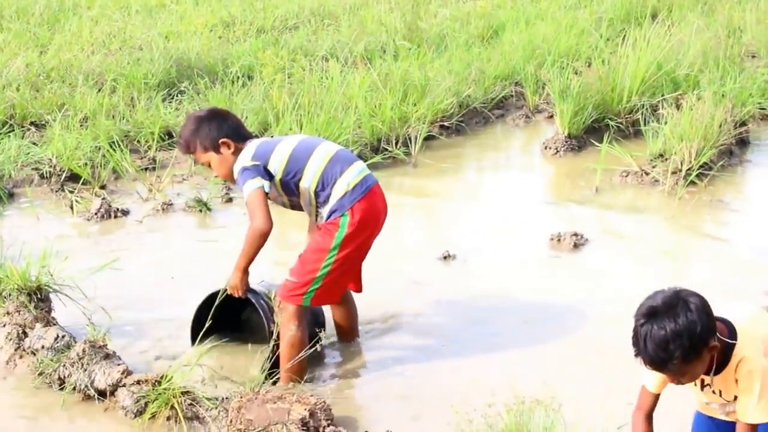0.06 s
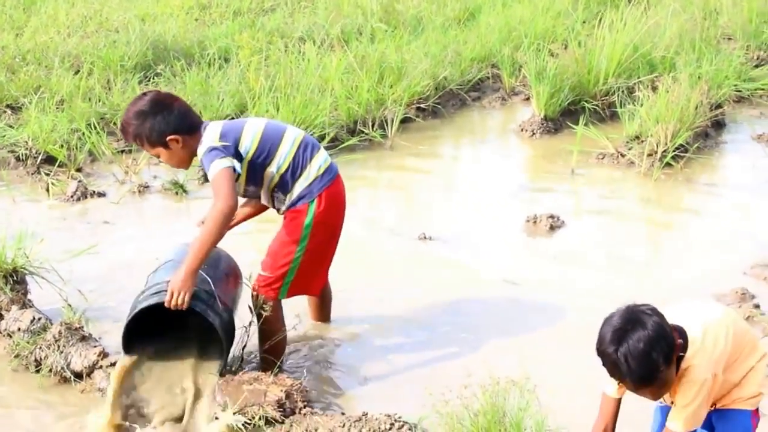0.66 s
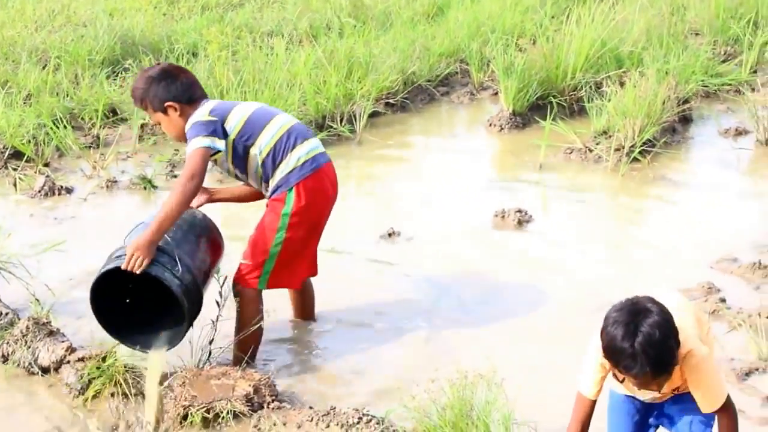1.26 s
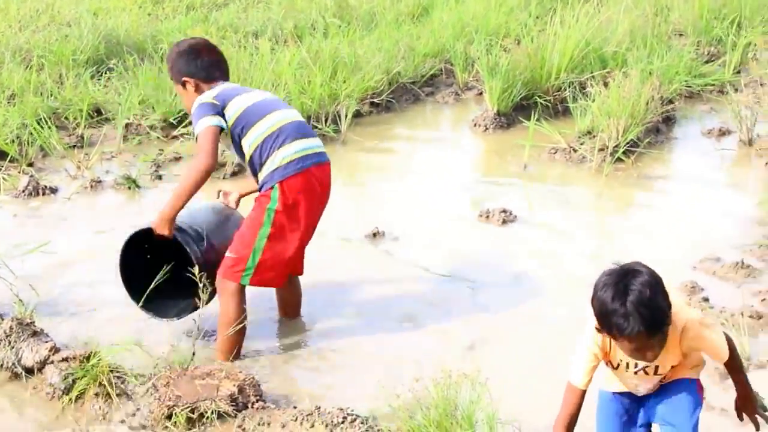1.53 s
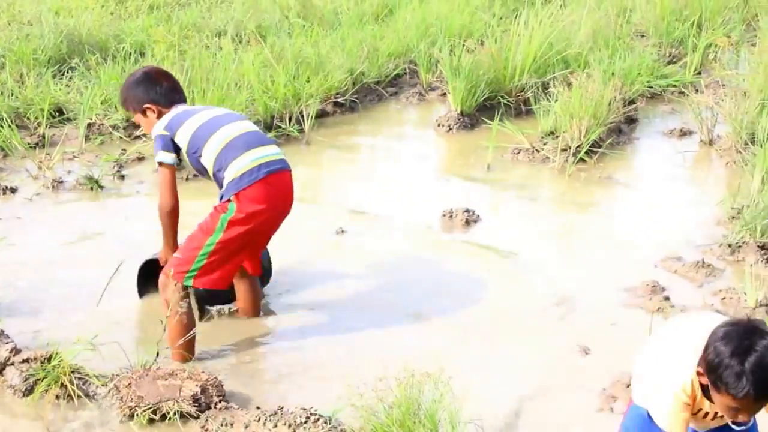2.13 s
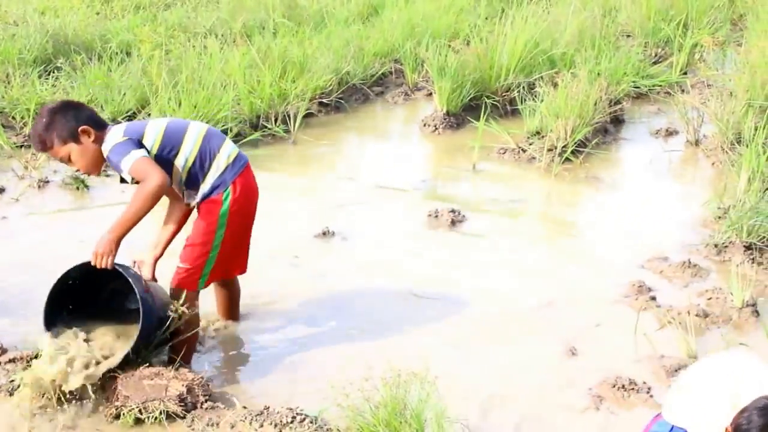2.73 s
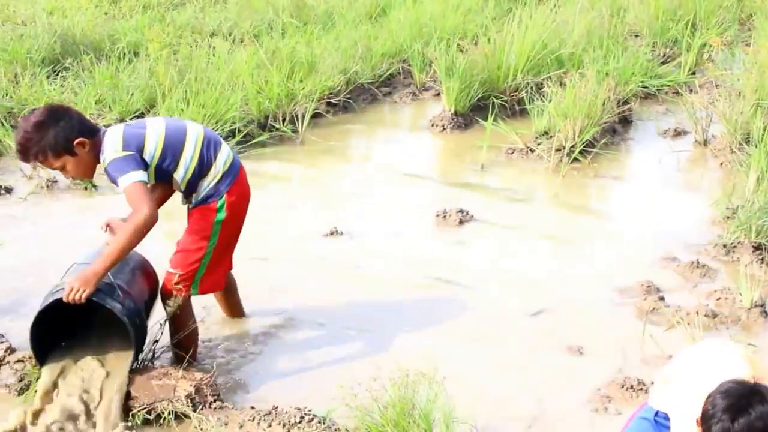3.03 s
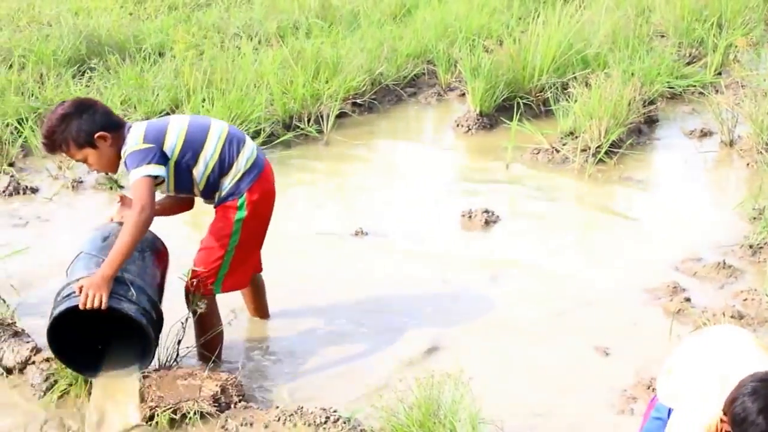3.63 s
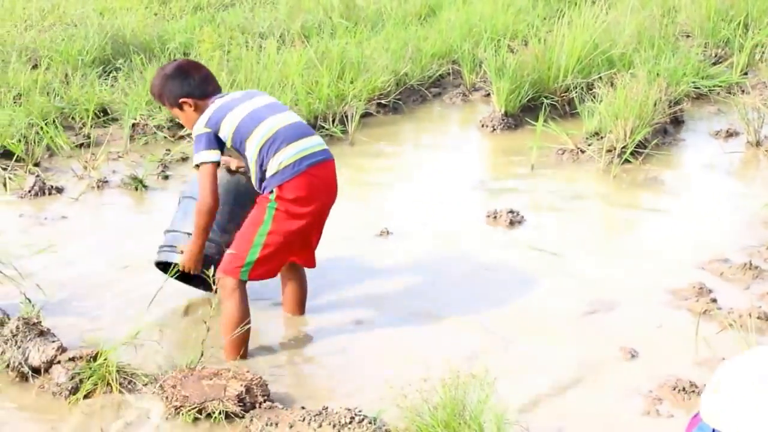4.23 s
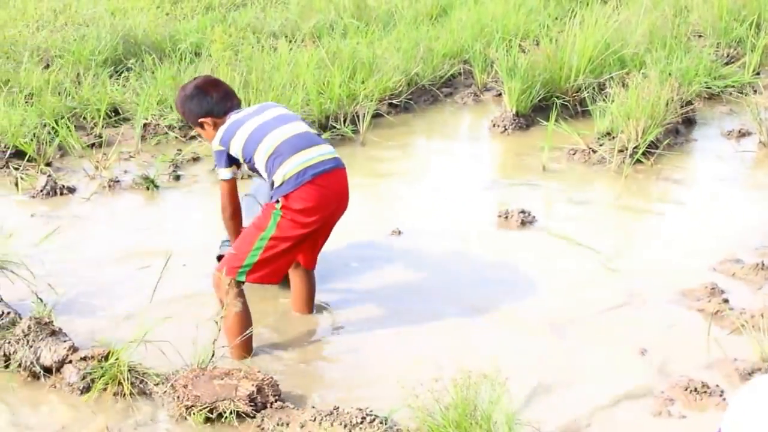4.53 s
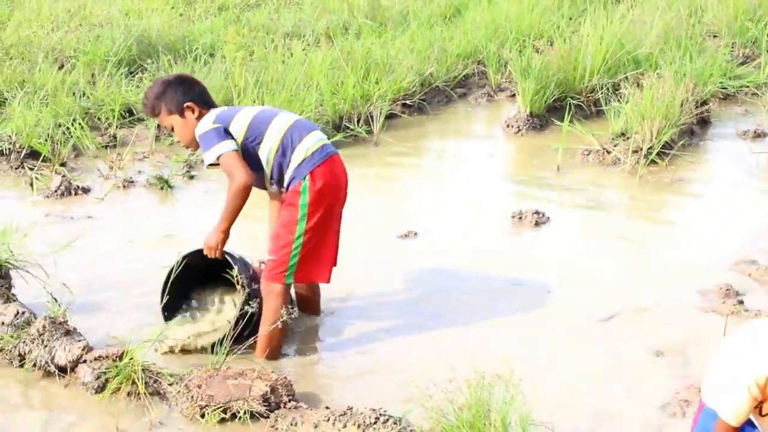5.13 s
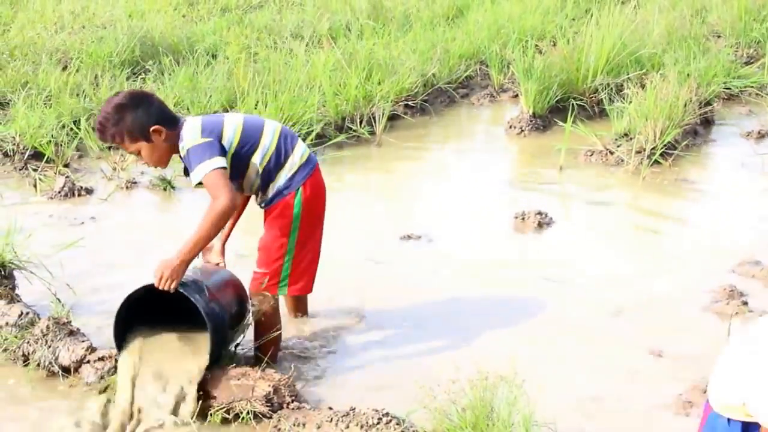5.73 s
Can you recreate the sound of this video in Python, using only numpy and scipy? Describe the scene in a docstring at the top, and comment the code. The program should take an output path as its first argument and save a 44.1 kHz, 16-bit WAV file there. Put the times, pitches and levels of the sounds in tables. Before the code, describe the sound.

A plastic bucket sloshes through a shallow muddy pool a few metres away, then is tipped onto the bank with a wet slap and a stream that drains off. A second scoop and pour follow, with plops and spatters between. A hard thump of wind hits the microphone before a third scoop and a softer pour at the very end. Gusts rumble throughout over a faint outdoor hiss.

```python
"""Wind rumbles on the microphone over a soft hiss as a plastic bucket sloshes through a shallow muddy pool.
The water is a cloud of short bubbles, drop impacts and foam; single plops and spatters stand out of it.
At 0.7 s the bucket is tipped out on the bank: a slap, then a stream that drains away. A second scoop
is poured out at 3 s. At 4.4 s the hardest thump of wind makes the limiter briefly turn everything down.
A third scoop follows, and its softer pour begins at 5.6 s, just before the end."""
import sys
import numpy as np
from scipy import signal
from scipy.fft import rfft, irfft
from scipy.io import wavfile
from scipy.ndimage import uniform_filter1d

SR = 44100
rng = np.random.default_rng(int(sys.argv[2]) if len(sys.argv) > 2 else 0)


def master(y):
    """Save y as 16-bit WAV."""
    cut = np.clip(np.atleast_2d(y).T, -1, 1)
    pcm = np.round(cut * 32767)  # scale
    wavfile.write(sys.argv[1], SR, pcm.astype(np.int16))


N = 254898
TIME = np.arange(N) / SR
FREQS = np.fft.rfftfreq(N, 1 / SR)

# Levels in a table compare its rows; the functions set the final loudness.
# tone of the still air over the field: (frequency [Hz], level [dB])
AIR_TONE = [(90, -15), (170, 1), (330, -6), (600, -6.5), (800, -4.5), (1200, -19), (1420, -17.5),
            (2400, -21.5), (7500, -17), (12000, -24.5), (15700, -28)]
# tones of the slow and the quick swirls of wind: (frequency [Hz], level [dB])
RUMBLE_TONE = [(8, -20), (24, 1.5), (45, -4.5), (80, -4.5), (110, -20.5), (200, -33), (500, -100)]
FLUTTER_TONE = [(50, -63), (95, 6.5), (160, -3), (250, -17), (400, -30), (900, -98), (3000, -100)]
# the breeze under the gusts, with a lull in the middle: (time [s], level [dB])
BREEZE_LEVELS = [(0, -34), (.6, -38), (1.3, -26.5), (1.65, -37.5), (2.2, -33), (2.65, -47), (2.9, -43),
                 (3.05, -27.5), (4.1, -30.5), (4.3, -39.5), (4.7, -27), (5.8, -37)]
# gusts at the microphone: (time [s], length [s], rumble [dB], flutter [dB])
WIND_GUSTS = [(0.013, 0.032, -20.5, -36), (.17, 0.015, -24, -34.5), (0.338, 0.18, -20.5, -26),
              (0.649, 0.035, -13, -18.5), (0.723, 0.15, -18, -28), (0.876, 0.34, -24, -28),
              (1.28, 0.14, -29, -36), (1.742, 0.089, -27, -39.5), (1.951, 0.083, -20, -32),
              (3.055, 0.03, -24, -36), (3.166, 0.11, -31, -46), (3.516, 0.032, -19.5, -29),
              (3.71, 0.059, -24.5, -30), (4, 0.16, -26.5, -38.5), (4.426, 0.027, -10.5, -25),
              (4.564, 0.075, -19, -26.5), (4.922, .16, -23.5, -33), (5.204, 0.014, -21, -29),
              (5.347, 0.072, -28.5, -32), (5.517, 0.041, -23.5, -37), (5.655, 0.2, -24, -28.5)]
# single swirls that thump the microphone: (time [s], level [dB], swing rate [Hz])
WIND_THUMPS = [(0.345, -6, 77), (0.347, -12.5, 200), (0.408, -12, 164), (0.417, -14.5, 280),
               (0.451, -12.5, 205), (0.584, -3, 44.6), (0.663, -10, 85), (0.663, -9, 200),
               (0.691, -2, 28.3), (1.233, -8.5, 134), (1.974, -12, 45), (3.526, -17, 40), (4.402, -7.5, 29),
               (4.43, 8.5, 66), (4.605, -5, 32.3), (4.64, -6.5, 52), (5.744, -5.5, 51)]

# tone of moving water: (frequency [Hz], level [dB])
WATER_TONE = [(120, -11), (190, 2.5), (255, 2), (365, -3.5), (460, -2), (600, 1.5), (900, -5.5), (1400, -7),
              (2500, -11.5), (4000, -17), (6000, -19.5), (9500, -25), (13000, -30.5), (15700, -36)]
# the pool keeps lapping between scoops: (time [s], level [dB])
LAPPING_LEVELS = [(0, -46), (1.5, -44), (2.1, -45.5), (3.8, -44), (4.2, -49.5), (4.5, -55), (4.7, -47.5),
                  (5.0, -43.5), (5.8, -37)]
# bucket and legs push through the pool:
# (time [s], length [s], level [dB], boost per step up in band [dB], extra gulping [dB])
SCOOP_SLOSHES = [(0.0, 0.054, -43, -6, 4), (0.24, 0.038, -50, 1, 8), (0.338, 0.14, -38.5, 1, 5.5),
                 (0.554, 0.042, -39, -1.5, 3), (0.984, 0.062, -28.5, -4, -8), (1.138, 0.038, -32, 0, 5),
                 (2.175, 0.23, -33.5, -4, -13), (2.476, 0.2, -34, 1.5, -0.5), (2.71, 0.079, -40, 0.5, 1),
                 (2.87, 0.0065, -32.5, 1, -15), (3.07, 0.042, -31, -3.5, 5), (3.37, 0.027, -36, -3, 1),
                 (3.588, 0.15, -36, -3.5, -14), (3.731, 0.05, -31.5, -1, -6),
                 (4.777, 0.16, -34.5, -5.5, -5.5), (5.07, 0.017, -50, 7, 20),
                 (5.221, 0.046, -32.5, .5, 0.5), (5.335, 0.074, -37, 0.1, 2), (5.446, 0.073, -38, -2.3, 9)]
# notes at which the air in the bucket rings: (frequency [Hz], width [Hz], level [dB])
BUCKET_NOTES = [(563, 99, -40), (942, 160, -8.5), (1408, 38, -10.5)]
# single air pockets that ring out clearly: (time [s], pitch [Hz], level [dB])
LOUD_PLOPS = [(0.1503, 2010, -28), (0.2656, 990, -29), (.2668, 2840, -22.5), (.3391, 1490, -18.5),
              (0.582, 1730, -28), (.7256, 1766, -19), (.7251, 662, -11.5), (.8896, 694, -20),
              (.9882, 325, -19), (1.0433, 1950, -18), (1.056, 2541, -19), (1.1438, 990, -17.5),
              (1.1468, 2120, -21), (1.4737, 2230, -23), (1.4924, 1500, -22), (1.517, 950, -27.5),
              (1.5679, 1470, -18), (1.5793, 1490, -20), (1.8854, 1930, -29), (1.9256, 3550, -24),
              (1.9615, 1000, -24), (1.976, 1440, -26), (2.0949, 2020, -25), (2.1129, 596, -26.5),
              (2.1453, 1820, -25.5), (2.161, 2660, -25), (2.1973, 554, -21.5), (2.2651, 810, -23.5),
              (2.3465, 3430, -16.5), (2.3267, 634, -28), (2.404, 1100, -22.5), (2.4301, 2030, -26),
              (2.4806, 500, -22), (2.616, 813, -12.5), (2.6509, 2390, -13), (2.6549, 1860, -14.5),
              (2.6968, 277, -24.5), (2.8706, 220, -24), (2.975, 830, -15.5), (2.9876, 590, -16),
              (3.0265, 293, -16), (3.0791, 556, -16.5), (3.085, 273, -18), (3.2462, 574, -17),
              (3.3048, 590, -19), (3.3674, 444, -21), (3.3916, 910, -22), (3.5912, 453, -19.5),
              (4.8062, 1140, -23.5), (4.8488, 1310, -24), (5.2231, 2153, -28), (5.4814, 497, -21.5),
              (5.6192, 598, -18.5), (5.6292, 1470, -21)]
# flung water lands on pool and mud: (time [s], level [dB], middle frequency [Hz], fade time [s])
FLUNG_WATER = [(0.233, -31, 1390, 0.011), (.268, -31, 3020, .0072), (0.337, -36, 3000, .004),
               (.403, -28.5, 4530, 0.0037), (.679, -33, 1500, 0.0098), (.715, -26, 1480, 0.012),
               (0.995, -42, 5500, .004), (1.282, -30.5, 8100, 0.0036), (1.566, -27.5, 1480, 0.014),
               (1.65, -26, 9800, .0016), (1.92, -33, 4180, .005), (2.159, -34, 3500, .005),
               (2.182, -27, 1310, 0.011), (2.238, -31, 3930, 0.0051), (2.299, -26.5, 3100, 0.0033),
               (2.328, -24.5, 750, 0.0037), (2.336, -25, 2800, .008), (2.403, -36, 1700, 0.0032),
               (2.465, -29, 3400, 0.012), (2.569, -25, 2930, 0.0089), (2.443, -31, 4400, .005),
               (2.649, -24, 2400, 0.0088), (2.721, -34, 3680, 0.006), (2.945, -24, 3840, 0.013),
               (2.974, -16.5, 1520, 0.016), (3.142, -27.5, 6000, .0039), (3.205, -25.5, 3000, 0.008),
               (3.735, -27.5, 3540, .0053), (4.291, -29, 1380, 0.0031), (4.609, -31, 3320, 0.0018),
               (4.926, -23.5, 4100, 0.0027), (5.22, -24.5, 2450, 0.0072), (5.387, -24, 3930, 0.0049),
               (5.486, -29, 3520, .005), (5.62, -20, 1700, 0.0061), (5.696, -30, 3400, 0.0034)]
# the bucket is tipped out:
# (landing time [s], length at full flow [s], stream [dB], first slap [dB], extra gulping [dB])
BUCKET_POURS = [(0.687, 0.5, -31, -24.5, -10), (2.973, 0.31, -29.5, -28.5, -5.5),
                (5.625, .2, -36.5, -57, -5)]

# The water has four bands, from low to high: (gulping, gurgling, splashing, spray)
LAP_DB, SLOSH_DB = (-6.5, -5.5, -1, -6), (-7, -1.5, -3, -8)
SLAP_DB, STREAM_DB = (-4.5, -1, -2.5, -8.5), (-1, -2, -3, -9)
DRAIN_S = (0.16, 0.22, 0.24, 0.15)  # the spray dies first as the stream thins


def gain_of(db):
    """Turns decibels into a number to multiply a sound by."""
    return 10 ** (np.asarray(db) / 20)


def evened(x):
    """Scales a signal so that its average strength (rms) is 1."""
    return x / np.sqrt(np.mean(x ** 2) + 1e-20)


def colour(points):
    """Joins the points of a tone table into a gain for every frequency."""
    hz, db = np.transpose(points)
    return gain_of(np.interp(np.log(FREQS + 1), np.log(hz + 1), db))


def filtered(x, gain):
    """Turns each frequency up or down by its own gain."""
    return irfft(rfft(x) * gain, N)


def level_curve(table):
    """Joins the points of a level table into a gain for every moment."""
    times, db = np.transpose(table)
    return gain_of(np.interp(TIME, times, db))


def add(mix, start, sound):
    """Mixes a sound in at a start time in seconds."""
    part = mix[max(round(start * SR), 0):][:len(sound)]
    part += sound[:len(part)]


def wander(rate_hz):
    """A smooth random drift up and down."""
    return evened(filtered(rng.standard_normal(N), np.exp(-(FREQS / rate_hz) ** 2)))


def surge(start, length, rise_s, fall_s):
    """A loudness shape that is full by the start time, holds, then dies away."""
    rising = np.clip((TIME - start) / rise_s + 1, 0, 1)
    return rising * np.exp(-np.clip((TIME - start - length) / fall_s, 0, 40))


def air(level_db, waver_db):
    """The open field hisses softly, and the level flickers a little."""
    hiss = evened(filtered(rng.standard_normal(N), colour(AIR_TONE)))
    return gain_of(level_db + waver_db * wander(rate_hz=23)) * hiss


def swirls(tone, steadiness):
    """Swirling air pushes at random; a steadiness near 1 evens out its strength."""
    swirl = signal.hilbert(filtered(rng.standard_normal(N), colour(tone)))
    strength = np.sqrt(uniform_filter1d(abs(swirl) ** 2, size=1800) + 1e-20)
    return evened(swirl.real / strength ** steadiness)


def wind(rumble_db, flutter_db, thump_db, swings_in, swings_out):
    """Gusts rumble and flutter over a breeze; big swirls hit the microphone fast and swing out."""
    power = np.outer(gain_of([0, -10.5]), level_curve(BREEZE_LEVELS)) ** 2  # rumble, weaker flutter
    for start, length, *db in WIND_GUSTS:
        power += np.outer(gain_of(db), surge(start, length, rise_s=0.034, fall_s=0.03)) ** 2
    rumble, flutter = np.sqrt(power)
    out = gain_of(rumble_db) * rumble * swirls(RUMBLE_TONE, steadiness=0.63)
    out += gain_of(flutter_db) * flutter * swirls(FLUTTER_TONE, steadiness=0.74)
    t = np.arange(-SR // 10, SR // 10) / SR
    swings = np.where(t < 0, swings_in, swings_out)
    for when, db, hz in WIND_THUMPS:
        thump = -np.sin(2 * np.pi * hz * t) / np.cosh(hz * t / swings)
        add(out, when + t[0], gain_of(db + thump_db) * thump)
    return out


def water_flow():
    """Lapping, sloshes and pours add up to the strength of each of the four bands over time."""
    power = np.outer(gain_of(LAP_DB), level_curve(LAPPING_LEVELS)) ** 2
    band_step, gulping = np.array([-1, 0, 1, 2]), np.array([1, 0, 0, 0])
    for start, length, db, bright_db, gulp_db in SCOOP_SLOSHES:
        slosh = gain_of(db + np.array(SLOSH_DB) + bright_db * band_step + gulp_db * gulping)
        power += np.outer(slosh, surge(start, length, rise_s=0.029, fall_s=0.052)) ** 2
    for start, length, stream_db, slap_db, gulp_db in BUCKET_POURS:
        slap = gain_of(slap_db + np.array(SLAP_DB) - 1.5 * gulping)
        power += np.outer(slap, surge(start, length=0.057, rise_s=0.025, fall_s=0.018)) ** 2
        stream = gain_of(stream_db + np.array(STREAM_DB) + gulp_db * gulping)
        for band, drain in enumerate(DRAIN_S):
            power[band] += (stream[band] * surge(start, length, rise_s=0.025, fall_s=drain)) ** 2
    return np.sqrt(power)


def bubble(hz, swell_s, rise, roundness):
    """An air pocket swells, rings briefly in the thick water, and rises in pitch as it surfaces."""
    age = np.arange(int(9 * swell_s * SR) + 2) / (swell_s * SR)  # loudest at age 1
    pitch = hz * (1 + rise * np.tanh((age - 1) / 2))
    loudness = (age * np.exp(1 - age)) ** roundness
    return loudness * np.sin(2 * np.pi * np.cumsum(pitch) / SR)


def impacts(per_s, spread_db):
    """Clicks at random times, many small and a few large."""
    out = np.zeros(N)
    when, chance = rng.random((int(per_s * N / SR) + 1, 2)).T
    size = np.minimum(-np.log(1 - chance), 3.5)
    out[(when * N).astype(int)] = gain_of(spread_db * size) * (-1) ** np.arange(len(when))
    return out


def bubble_cloud(density, cycles, spread_db, rise):
    """Bubbles of all sizes; the small, high ones are more common and ring for more cycles."""
    out = np.zeros(N)
    for hz in np.geomspace(200, 12000, 60):
        khz = hz / 1000
        swell_s = cycles * khz ** 0.5 * rng.uniform(0.36, 1.73) / hz
        ring = bubble(hz, swell_s, rise, roundness=0.26)
        births = impacts(density * khz ** 0.7, spread_db)
        out += np.sqrt(khz) * evened(signal.oaconvolve(births, ring)[:N])
    return evened(out)


def churn(flow, bands_db, drops_db, foam_db, clump_db, gush_db):
    """Bubbles, drop impacts and foam come in clumps and follow the scooping and pouring."""
    grains = bubble_cloud(density=17, cycles=1.195, spread_db=2.5, rise=0.11)
    grains += gain_of(drops_db) * evened(impacts(per_s=1700, spread_db=3.0))
    # in a strong pour the tiny sounds merge into one gush
    foam = gain_of(foam_db) + flow[2] / gain_of(gush_db)
    grains = (evened(grains) + foam * rng.standard_normal(N)) / np.sqrt(1 + foam ** 2)
    grains *= gain_of(clump_db * wander(rate_hz=41))
    # large pockets gulp, middling ones gurgle, small ones splash, the finest make spray
    below = [1 / (1 + (FREQS / edge_hz) ** 8) for edge_hz in (450, 1100, 3500)]
    shares = np.maximum(np.diff(below, axis=0, prepend=0, append=1), 0)
    tone = colour(WATER_TONE)
    bands = [evened(filtered(grains, tone * np.sqrt(share))) for share in shares]
    return sum(gain_of(db) * level * band for db, level, band in zip(bands_db, flow, bands))


def bucket_ring(water):
    """The air in the open bucket rings along with the water in and around it."""
    ringing = sum(gain_of(db) / (1 + 2j * (FREQS - hz) / width) for hz, width, db in BUCKET_NOTES)
    return filtered(water, 1 + ringing)


def bank_echo(water, echo_db, fade_s):
    """The pool, the bucket and the banks scatter a very short echo."""
    t = np.arange(SR // 6) / SR
    bounces = rng.standard_normal(len(t)) * (rng.random(len(t)) < 0.06)
    bounces *= np.exp(-t / fade_s) * (t > 0.003)
    return water + gain_of(echo_db) * signal.oaconvolve(water, bounces / np.linalg.norm(bounces))[:N]


def droplets(spray, level_db, per_s, spread_db, tick_hz, tick_s):
    """Stray drops tick on the surface; the more spray, the louder."""
    hits = impacts(per_s, spread_db)
    t = np.arange(512) / SR
    tick_power = (t / tick_s) ** 2 * np.exp(-2 * t / tick_s)
    bursts = np.sqrt(abs(signal.oaconvolve(hits ** 2, tick_power)[:N]))
    tone = FREQS ** 2 / (1 + (FREQS / tick_hz) ** 3.97)
    ticks = filtered(bursts * rng.standard_normal(N), tone)
    return gain_of(level_db) * spray * evened(ticks)


def plop(hz, rise):
    """One air pocket rings; a larger one sounds lower and lasts longer."""
    return bubble(hz, swell_s=0.0023 / (hz / 1000) ** 0.8, rise=rise, roundness=1.57)


def stray_plops(splashing, level_db, spread_db, low_hz, high_hz, count):
    """Further pockets pop at random, louder where the water is stirred harder."""
    out = np.zeros(N)
    for when, height, softness in rng.random((count, 3)):
        hz = low_hz * (high_hz / low_hz) ** height
        add(out, when * N / SR, gain_of(level_db - spread_db * softness) * plop(hz, rise=0.053))
    return out * splashing


def loud_plops(level_db):
    """Single bubbles ring out clearly above the churning water."""
    out = np.zeros(N)
    for start, hz, db in LOUD_PLOPS:
        add(out, start, gain_of(db + level_db) * plop(hz, rise=0.057))
    return out


def spatters(level_db, rise_share, grain_db, width, soft_hz):
    """Each sheet of water breaks into a quick burst of tiny impacts, softened by the mud."""
    out, t = np.zeros(N), np.arange(4096) / SR
    hz = np.fft.rfftfreq(len(t), 1 / SR) + 1
    mud = 1 + (hz / soft_hz) ** 2
    for start, db, middle_hz, fade_s in FLUNG_WATER:
        noise, size = rng.standard_normal((2, len(t)))
        off_middle = (hz / middle_hz - middle_hz / hz) / width
        tone = 1 / np.sqrt((1 + off_middle ** 2) * mud)
        burst = evened(irfft(rfft(noise * gain_of(grain_db * size)) * tone))
        loudness = (1 - np.exp(-t / (rise_share * fade_s))) * np.exp(-t / fade_s)
        add(out, start, gain_of(db + level_db) * burst * loudness)
    return out


def limiter(x, ceiling_db, recovery_db_per_s):
    """Peaks over the ceiling turn the volume down at once; it then creeps back."""
    over_db = 20 * np.log10(abs(x).max(0) + 1e-9) - ceiling_db
    recovery_db = TIME * recovery_db_per_s
    dip_db = np.maximum(np.maximum.accumulate(over_db + recovery_db) - recovery_db, 0)
    return x / gain_of(uniform_filter1d(dip_db, size=90))


def scene():
    """Water a few metres away, wind right at the microphone."""
    flow = water_flow()
    splashing, spray = flow[2:]
    water = churn(flow, bands_db=(-3.5, -3.5, -3, -3), drops_db=-3.5, foam_db=-15,
                  clump_db=2, gush_db=-33.5)
    water += loud_plops(level_db=-3.5)
    water += spatters(level_db=-0.5, rise_share=0.18, grain_db=1.5, width=0.46, soft_hz=9000)
    water += stray_plops(splashing, level_db=8, spread_db=5, low_hz=600, high_hz=4730, count=110)
    water += droplets(spray, level_db=-6.5, per_s=65, spread_db=2, tick_hz=3800, tick_s=0.0013)
    gusts = wind(rumble_db=-1, flutter_db=-1.57, thump_db=-2, swings_in=0.15, swings_out=0.42)
    water = bank_echo(bucket_ring(water), echo_db=-13, fade_s=0.012)
    return (water + gusts + air(level_db=-47, waver_db=1.45))[None]


def record(dry):
    """The limiter holds down the peaks, then the very highest treble is cut off."""
    held = limiter(dry, ceiling_db=-1, recovery_db_per_s=113)
    treble_cut = signal.firwin(511, cutoff=15800, window=("kaiser", 9), fs=SR)
    return signal.oaconvolve(held, treble_cut[None], "same")


dry = scene()
out = record(dry)
master(out)
```